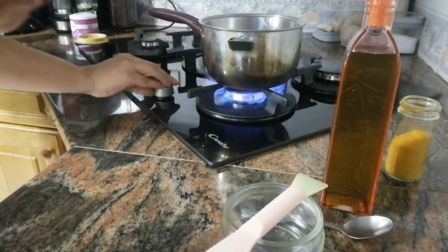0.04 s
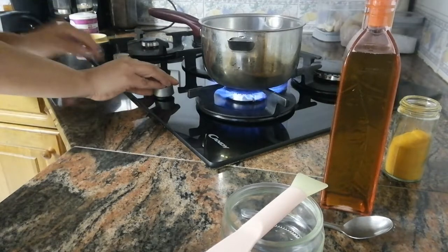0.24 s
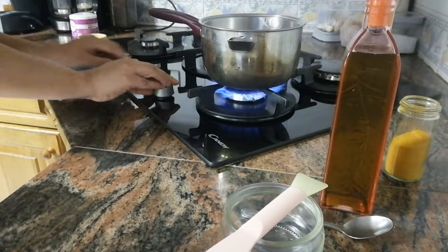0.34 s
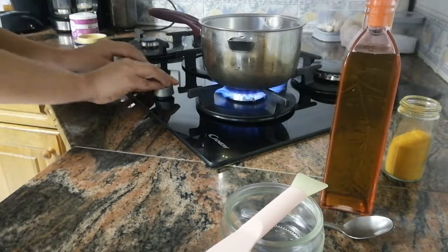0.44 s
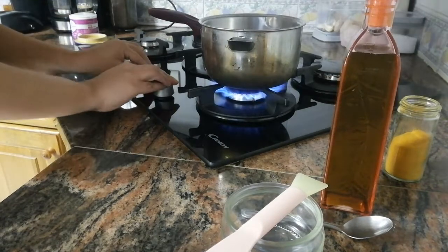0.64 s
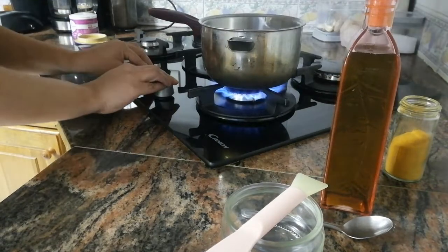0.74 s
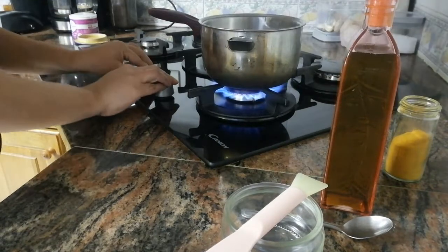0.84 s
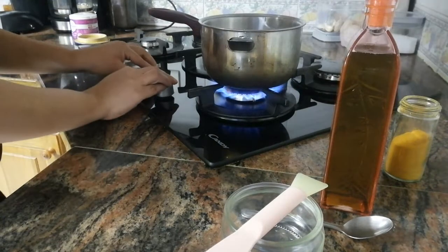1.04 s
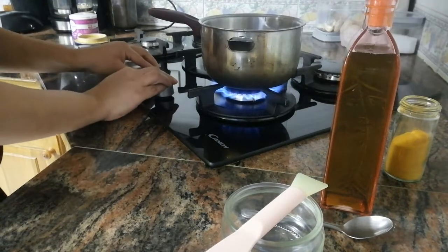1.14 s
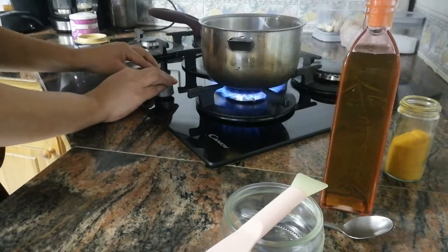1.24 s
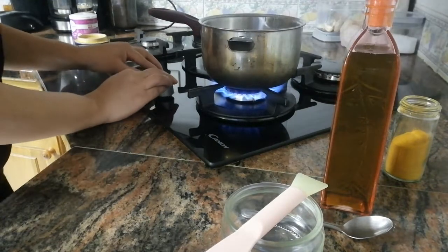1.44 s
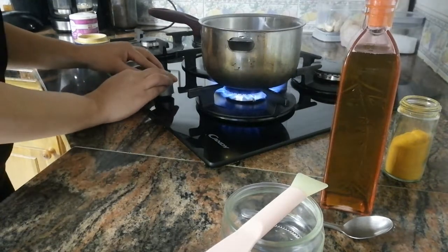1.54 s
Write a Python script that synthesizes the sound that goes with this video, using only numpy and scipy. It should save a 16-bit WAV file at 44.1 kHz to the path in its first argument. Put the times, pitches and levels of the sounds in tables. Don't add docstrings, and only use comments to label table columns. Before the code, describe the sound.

Gas stove igniter clicking in a small, reflective kitchen. At 0 s a soft low thud dies away as gas flares, settling by about 0.3 s into a faint uneven hiss with low rumble. Loud, crisp spark snaps come at 0.2, 0.6, 0.9 and 1.3 s, each with a short bright ring and a dip in the hiss. Very faint gas whistles near 0.4 and 1.4 s; quiet dry knob tick at 1.6 s.

```python
import sys
import numpy as np
from scipy import signal
from scipy.fft import rfft, irfft, next_fast_len
from scipy.io import wavfile
from scipy.ndimage import uniform_filter1d, minimum_filter1d, map_coordinates

SR = 44100
rng = np.random.default_rng(int(sys.argv[2]) if len(sys.argv) > 2 else 0)


def master(y):
    cut = np.clip(np.atleast_2d(y).T, -1, 1)
    pcm = np.round(cut * 32767)
    wavfile.write(sys.argv[1], SR, pcm.astype(np.int16))


def makeup_ratio(level_db):
    decades = np.asarray(level_db, float) / 20
    return 10 ** decades


N = 70560

# pitch in Hz, level in dB, time to fall by 60 dB in seconds.
THUD_MODES = [(95.6, -37, 0.24), (60, -62, .15), (311, -46, 0.077)]
# time in seconds, hiss level in dB, share of the flaring jet from 0 to 1,
# rumble level in dB.
FLAME_COURSE = [(0, -46, 0.74, 15), (0.028, -46.5, 1, 6.5), (.1, -48, 0.83, 0.5), (.2, -49, 0.61, 1.5),
                (.28, -49.5, 0, -3), (.42, -47.5, .15, 5), (.54, -47.5, 0.01, 6.5),
                (.66, -50.5, 0.06, -2.5), (.8, -47, 0, 4), (.92, -46, 0.04, 1), (1.0, -50, 0.04, 0),
                (1.17, -47.5, 0.02, -1), (1.34, -48, 0.1, -1.5), (1.45, -48, 0, 2.5), (1.6, -46.5, 0, 6)]
# frequency in Hz, left level in dB, right level in dB.
HISS_COLOUR = [(162, -64.5, -41.5), (318, -7.5, -8), (1110, -7.5, -7.5), (3240, -5.5, -6),
               (5260, -7.5, -6.5), (9020, -22, -2), (11900, -41.5, -19), (14800, -29, -23)]
# centre in Hz, width in Hz, lift in dB.
STEADY_PEAKS = [(1640, 188, 11), (1776, 54, 6), (1506, 120, 8), (3100, 50, 2.5), (3900, 320, 8.5),
                (5300, 740, -6.5), (6104, 170, 12), (9380, 570, 11), (13400, 400, 7), (14000, 300, -5)]
# centre in Hz, width in Hz, lift in dB.
FLARING_PEAKS = [(898, 150, 15.5), (1910, 350, 8.5), (2970, 50, 9), (4700, 130, 8), (5970, 550, -3),
                 (7000, 450, 8), (10600, 530, 8), (14200, 4200, -8)]
# frequency in Hz, likeness from -1 to 1.
LIKENESS = [(60, 1), (180, 0.97), (550, -0.74), (1650, 0.52), (4970, -0.34), (15000, 0.3)]
# frequency in Hz, level in dB per Hz.
RUMBLE_COLOUR = [(13, -30), (22, -12), (48, -8.5), (81, -0.5), (107, -12.5), (140, -1.5), (200, -14.5),
                 (300, -16.5), (390, -27), (660, -120)]
# time in seconds, strength in dB.
SPARKS = [
    (.2152, -.5),
    (.5746, 0),
    (.9346, -.5),
    (1.2940, -.5),
]
# delay to the left port in ms, left level in dB,
# delay to the right port in ms, right level in dB.
SPARK_PATHS = [(.2, -6, .2, -7), (1.35, 0, 1.0, -3), (3.6, 0, 2.45, 0), (4.0, -3, 3.4, 0),
               (4.95, -2, 4.55, -4), (5.9, -3, 6.15, -1), (7.4, -3, 8.6, -10), (10.4, -4, 12.4, -12)]
# frequency in Hz, left level in dB per Hz, right level in dB per Hz.
SNAP_COLOUR = [(400, -42.5, -42.5), (1900, -45, -32.5), (4070, -33.5, -24), (6840, -22, -7),
               (9330, -45, 4.5), (10220, -51, -5), (11900, -52, -21.5), (15100, -26, -25)]
# frequency in Hz, time to fall by 60 dB in seconds.
ROOM_DECAY = [(1500, 0.44), (4000, 0.38), (8000, 0.36), (12000, 0.21), (16000, 0.27)]
# frequency in Hz, left level in dB, right level in dB.
ROOM_COLOUR = [(930, -39, -43), (2890, -20, -21), (5360, -14.5, -14.5), (6960, -10.5, -5), (9500, -23.5, 2),
               (10480, -44, -2.5), (11730, -35.5, -12.5), (14900, -40.5, -22.5)]
# start in seconds, length in seconds, first pitch in Hz, last pitch in Hz, level in dB.
WHISTLES = [
    (.35, .19, 879, 895, -55.5),
    (1.321, 0.1, 621, 630, -56),
    (1.436, 0.21, 667, 692, -60),
]
# frequency in Hz, left level in dB, right level in dB.
TICK_COLOUR = [(1490, -36, -25), (3150, 11, 15), (3900, 11, -9), (4800, 8, 13), (6900, -23, -3),
               (9000, -22, -10), (15000, -37, -22)]


def unit(x):
    return x / np.sqrt(np.mean(x ** 2) + 1e-20)


def along(points, hz):
    f, v = np.transpose(points)
    return np.interp(np.log(hz + 1), np.log(f + 1), v)


def wobble(rate):
    knots = rng.standard_normal(int(N * rate / SR) + 4)
    return map_coordinates(knots, [np.arange(N) * rate / SR])


def coloured(x, spectrum, peaks=()):
    m = 2 * next_fast_len(x.shape[1] // 2 + 4096)
    hz = np.fft.rfftfreq(m, 1 / SR)
    lift_db = sum(db / (1 + (2 * (hz - centre) / width) ** 2) for centre, width, db in peaks)
    f, *ports = np.transpose(spectrum)
    gain = makeup_ratio([along(np.c_[f, db], hz) + lift_db for db in (ports[0], ports[-1])])
    cepstrum = irfft(np.log(gain + 1e-6), m)
    cepstrum[:, 1:m // 2] *= 2
    cepstrum[:, m // 2 + 1:] = 0
    return irfft(rfft(x, m) * np.exp(rfft(cepstrum)), m)[:, :x.shape[1]]


def turbulence(patchy_db):
    hz, _, z = signal.stft(rng.standard_normal((2, N)), SR, nperseg=512)
    patches = uniform_filter1d(rng.standard_normal(z.shape[1:]), size=4, axis=0)
    patches = uniform_filter1d(patches, size=24, axis=1)
    turn = np.arccos(np.clip(along(LIKENESS, hz), -1, 1))[:, None] / 2
    mid = z[0] * np.cos(turn)
    side = z[1] * np.sin(turn)
    ports = np.array([mid + side, mid - side]) * makeup_ratio(patchy_db * unit(patches))
    return signal.istft(ports, nperseg=512)[1][:, :N]


def thud():
    on = np.maximum(np.arange(N) / SR + 0.0047, 0)
    tones = sum(makeup_ratio(db - 60 * on / t60) * np.sin(2 * np.pi * hz * on) for hz, db, t60 in THUD_MODES)
    return tones * (1 - np.exp(-on / 0.00036))


def flaring_jet():
    t = np.arange(N) / SR
    bend, bend_s = 0.04, 0.22
    speed = 1 + bend * (np.sin(np.pi * np.minimum(t / bend_s, 1.3)) - 0.7)
    read = np.cumsum(speed)
    noise = coloured(turbulence(2.5), HISS_COLOUR, FLARING_PEAKS)
    return unit(np.array([map_coordinates(port, [read], mode="mirror") for port in noise]))


def flame():
    s, *columns = np.transpose(FLAME_COURSE)
    level_db, share, rumble_db = [np.interp(np.arange(N) / SR, s, c) for c in columns]
    flare = np.clip(share, 0, 1)
    steady = unit(coloured(turbulence(2.5), HISS_COLOUR, STEADY_PEAKS))
    hiss = np.sqrt(flare) * flaring_jet() + np.sqrt(1 - flare) * steady
    lumps_db = 4.5 * wobble(13.66)
    rumble = makeup_ratio(-58 + rumble_db + lumps_db) * unit(coloured(turbulence(0.99), RUMBLE_COLOUR))
    return makeup_ratio(level_db + 0.4 * wobble(5.06)) * hiss + rumble


def partly_repeated(paths, share):
    return np.sqrt(share) * paths + np.sqrt(1 - share) * rng.standard_normal(paths.shape)


def snap(paths, t):
    scatter_db, jitter_ms = 1.5, 0.015
    arcs = np.zeros((2, len(t)))
    for row in SPARK_PATHS:
        late, size = rng.standard_normal(2)
        for side in range(2):
            u = t - (row[2 * side] + jitter_ms * late) / 1000
            click = np.sinc(u * SR) * (np.abs(u) < 8 / SR)
            arcs[side] += makeup_ratio(row[2 * side + 1] + scatter_db * size) * click
    hold_s, clutter_t60 = 0.006, 0.01
    clutter_db = -22 - 60 * np.maximum(t - hold_s, 0) / clutter_t60
    clutter = makeup_ratio(clutter_db) * partly_repeated(paths, 0.6) * np.minimum(t / 0.0015, 1)
    pulse = coloured(np.array([t == 0, t == 0]) * 1.0, SNAP_COLOUR)
    return coloured(arcs + clutter, SNAP_COLOUR) / np.abs(pulse).max()


def kitchen_tail(paths, t):
    rise_s, steepen_s = 0.0017, 0.75
    hz, ts, z = signal.stft(partly_repeated(paths, 0.4), SR, nperseg=256)
    decay = makeup_ratio(-60 * ts / along(ROOM_DECAY, hz)[:, None])
    tail = signal.istft(z * decay, SR, nperseg=256)[1][:, :len(t)]
    tail = tail * (1 - np.exp(-t / rise_s)) * np.exp(-(t / steepen_s) ** 2)
    tail = coloured(tail, ROOM_COLOUR)
    return makeup_ratio(4.5) * tail / np.linalg.norm(tail) * 4


def igniter():
    out = np.zeros((2, N + SR))
    t = np.arange(SR // 2) / SR
    paths = rng.standard_normal((2, len(t)))
    for s, db in SPARKS:
        start = round(s * SR)
        out[:, start:start + len(t)] += makeup_ratio(1 + db) * (snap(paths, t) + kitchen_tail(paths, t))
    return out[:, :N]


def whistles():
    t, out = np.arange(N) / SR, 0
    for s, length, hz0, hz1, db in WHISTLES:
        u = np.clip((t - s) / length, 0, 1)
        hz = hz0 + (hz1 - hz0) * u + 9 * wobble(39)
        phase = 2 * np.pi * np.cumsum(hz) / SR
        swell = np.minimum(3 * np.sin(np.pi * u), 1)
        out = out + makeup_ratio(db + 2.5 * wobble(28.8)) * swell * np.sin([phase, phase + 2.07])
    return out


def tick():
    start_s, level_db, t60, rise_s = 1.5918, -37, 0.11, 0.00064
    on = np.maximum(np.arange(N) / SR - start_s, 0)
    noise = unit(coloured(rng.standard_normal((2, N)), TICK_COLOUR))
    return makeup_ratio(level_db - 60 * on / t60) * (1 - np.exp(-on / rise_s)) * noise


def scene():
    return thud() + flame() + igniter() + whistles() + tick()


def ducked(x):
    duck_db, hold_s, drop_s, recover_s = -6, 0.0091, 0.0036, 0.2
    duck = 0
    for s, _ in SPARKS:
        after = np.arange(N) / SR - s - hold_s
        duck = duck + np.exp(-np.maximum(after, 0) / recover_s) * np.clip(after / drop_s + 1, 0, 1)
    return x * makeup_ratio(duck_db * duck)


def limited(x):
    ceiling, span = 0.97, round(0.001 * SR)
    needed = minimum_filter1d(ceiling / np.maximum(np.abs(x).max(axis=0), ceiling), size=2 * span + 1)
    return x * uniform_filter1d(uniform_filter1d(needed, size=span), size=span)


def roll_off(x):
    return signal.sosfilt(signal.butter(12, 16800, fs=SR, output="sos"), x)


def record(dry):
    x = ducked(dry)
    hz = np.fft.rfftfreq(N, 1 / SR)
    x = irfft(rfft(x) / (1 + (hz / 15900) ** 70), N)
    return roll_off(limited(x))


dry = scene()
out = record(dry)
master(out)
```